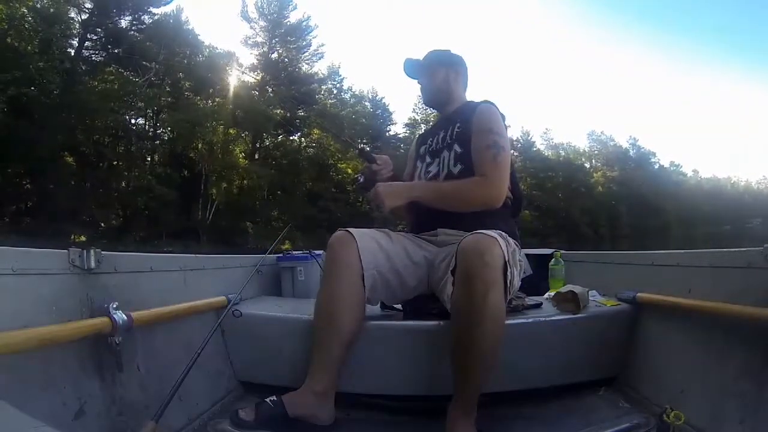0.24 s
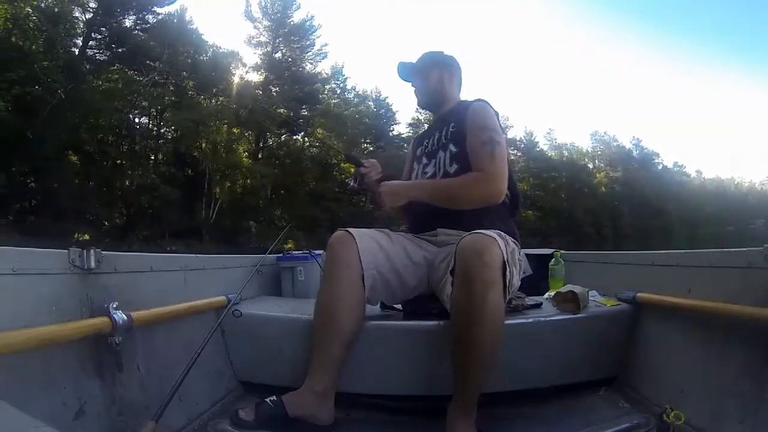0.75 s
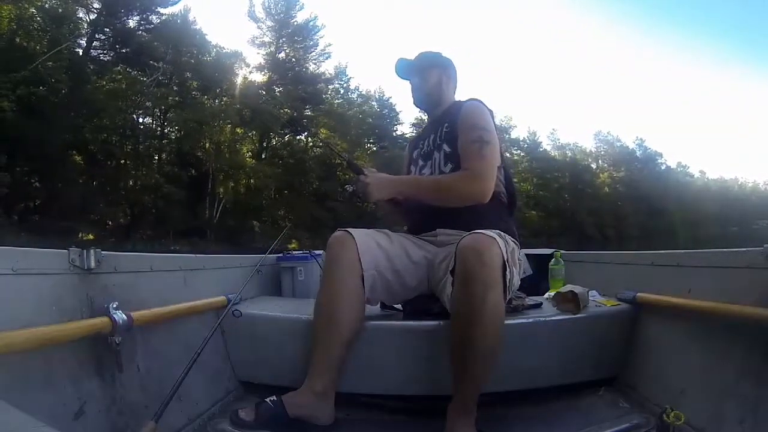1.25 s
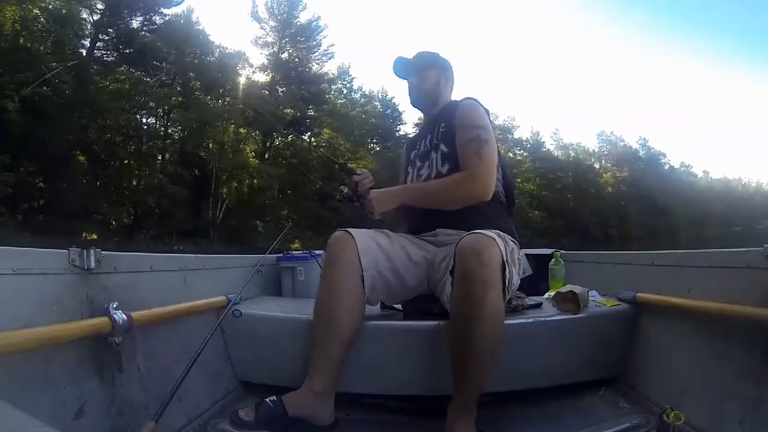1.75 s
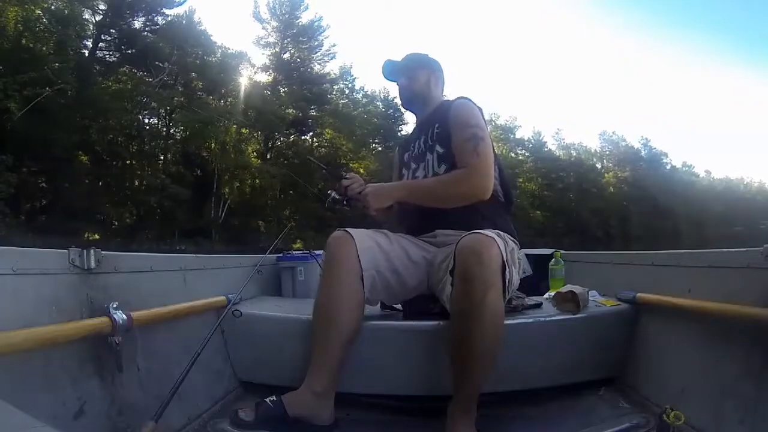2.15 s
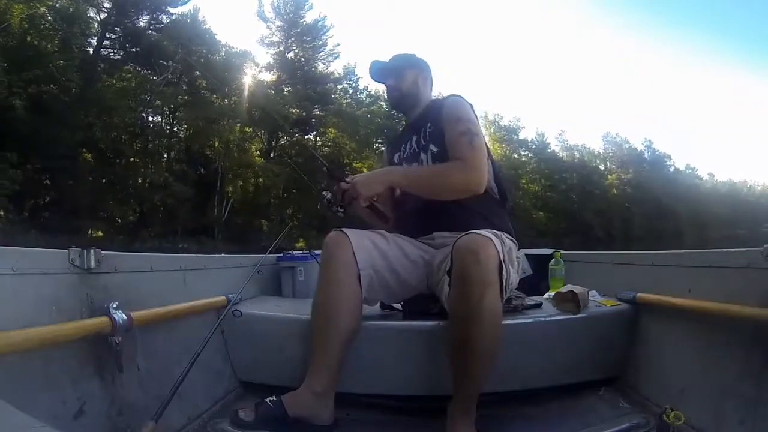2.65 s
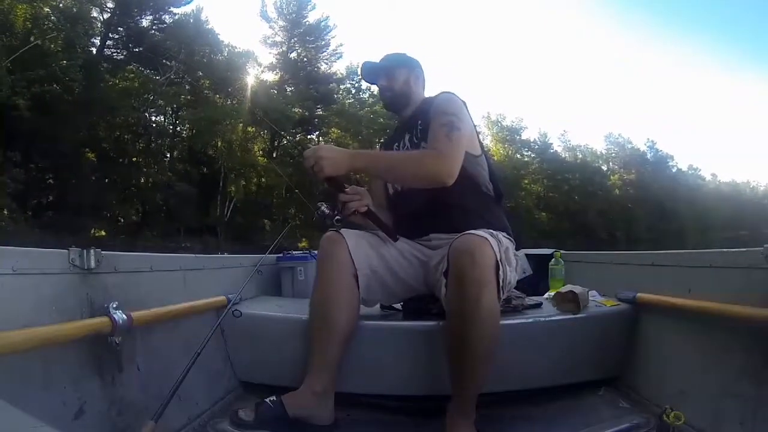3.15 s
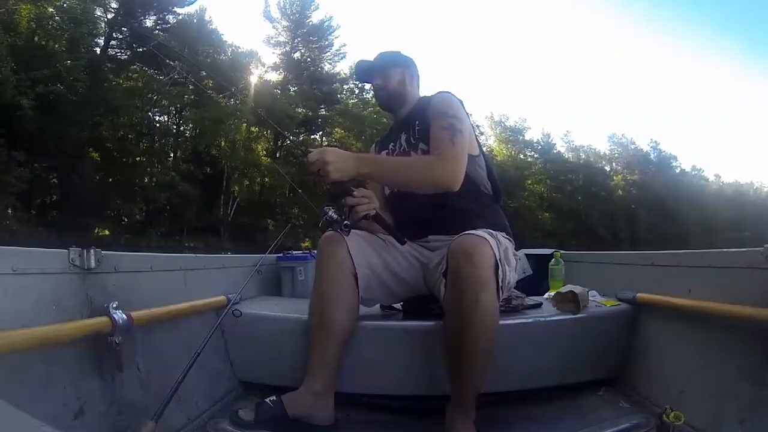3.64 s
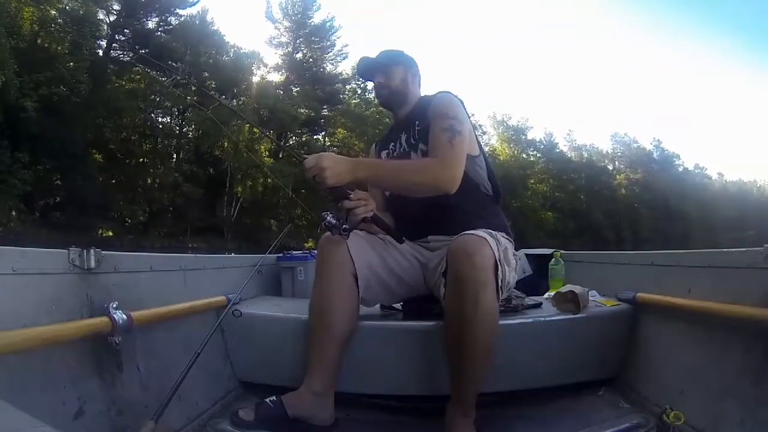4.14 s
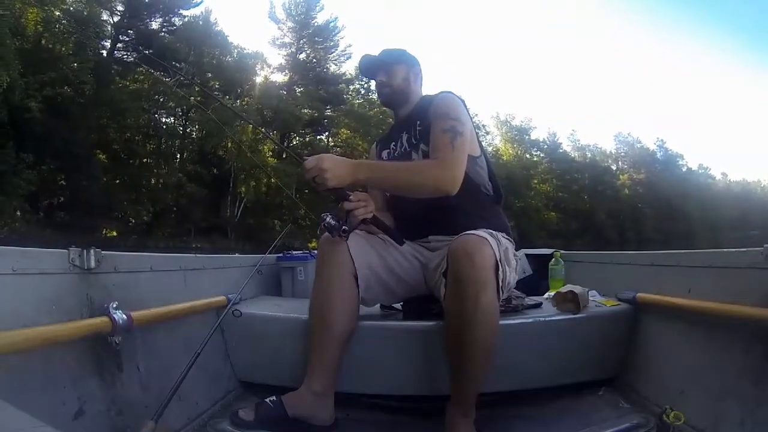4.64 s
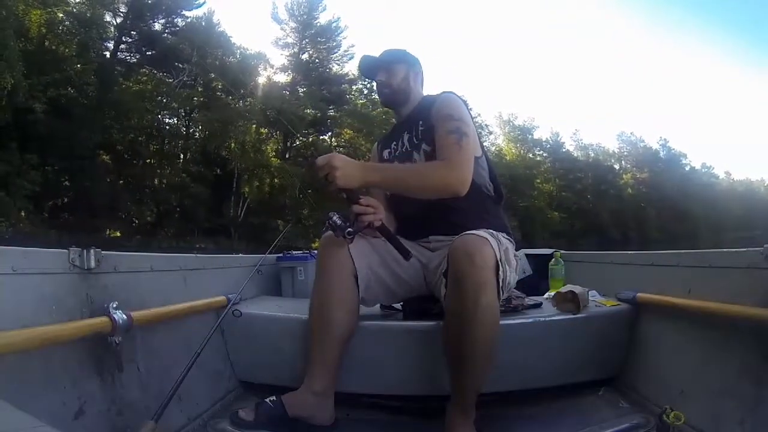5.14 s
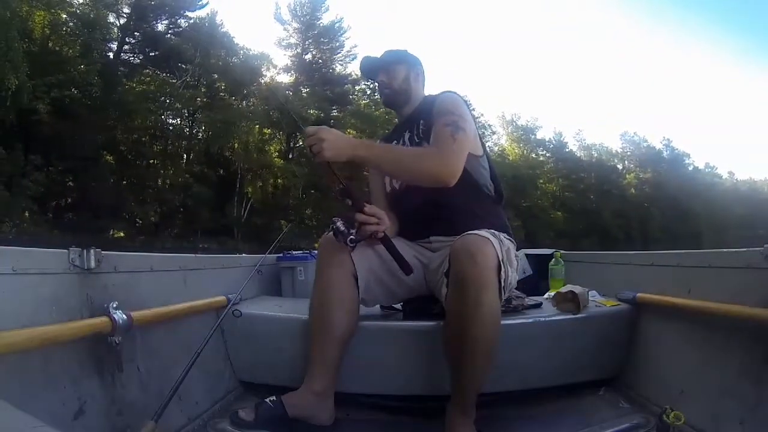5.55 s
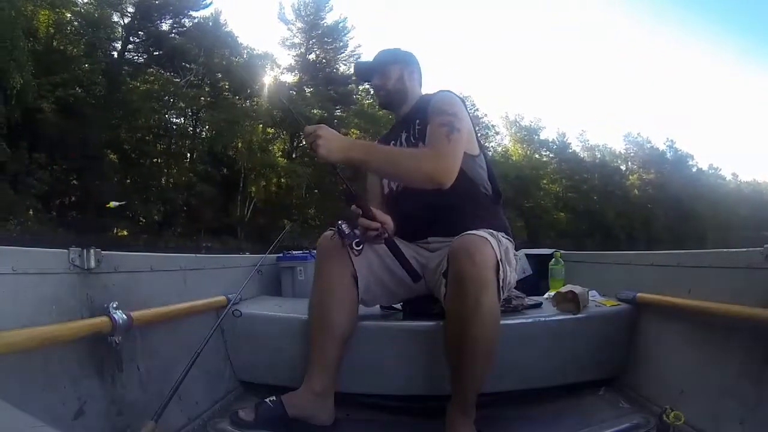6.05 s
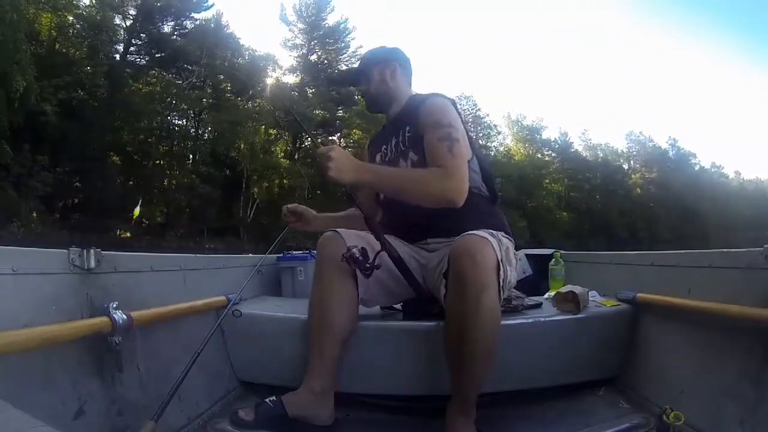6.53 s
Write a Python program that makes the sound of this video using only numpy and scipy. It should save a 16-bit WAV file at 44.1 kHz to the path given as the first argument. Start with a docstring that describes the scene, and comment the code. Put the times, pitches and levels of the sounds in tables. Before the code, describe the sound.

In a small metal boat, a fishing reel clicks, the hull thumps and clunks, and water glugs and laps alongside over low hiss and faint birdsong.

```python
"""Angler in a small boat

An angler handles a rod and reel in a small aluminium boat on a calm lake. The reel snaps and ticks in
filtered noise and metal modes; blows ring the modes of hull and bench. Water glugs, splashes, drips and laps
along the side in swarms of bubbles and noise bursts, heard directly and through the hull.
Far birds sing in gliding sines blurred by echoes, over steady noise: a low hiss and rumble."""
import sys
import numpy as np
from scipy import signal
from scipy.fft import rfft, irfft
from scipy.io import wavfile
from scipy.ndimage import uniform_filter1d

SR = 44100
rng = np.random.default_rng(int(sys.argv[2]) if len(sys.argv) > 2 else 0)


def persist_wave(psi):
    """Save psi, clipped to +-1, as 16-bit WAV."""
    counts = np.round(np.clip(psi, -1, 1) * 32767).astype(np.int16)
    wavfile.write(sys.argv[1], SR, np.atleast_2d(counts).T)


N = 299421

# centres of the spectrum bands of splashes and drops [Hz]
BANDS_HZ = np.geomspace(100, 16000, num=60)
# ripples along the side: (crest time [s], relative gurgle level [dB], relative fizz level [dB],
# build-up [s], t60 [s], bubble pitch at the crest [Hz], glide [octaves/s])
RIPPLES = [(.23, -57.5, -60, 0.05, 0.96, 1500, 0), (2.99, -54.5, -54.5, 0.057, 3.5, 1310, 3.5),
           (3.16, -46, -82, 0.077, 2, 590, -3), (3.315, -44.5, -60, 0.0091, 0.27, 890, -17),
           (3.582, -45, -61.5, 0.055, 0.094, 557, -5), (3.88, -51.5, -63, 0.048, 1.07, 690, -3.5),
           (4.11, -58.5, -57.5, 0.11, 1.2, 870, -9), (4.34, -51.5, -89, 0.016, 1.17, 520, -0.5),
           (5.19, -62.5, -76, 0.071, 1.25, 655, 5), (5.56, -47.5, -58, 0.049, 0.89, 1000, 4.5),
           (5.70, -49.5, -50, 0.086, 0.81, 467, 2), (6.02, -53.5, -57.5, 0.027, 1.3, 890, 0.5),
           (6.43, -58.5, -60, 0.1, 0.45, 1460, -1.5)]


def amp(db):
    """Decibels to gain."""
    return 10 ** (np.asarray(db) / 20)


def evened(x):
    """Scales to rms 1."""
    return x / np.sqrt(np.mean(x ** 2) + 1e-20)


def read(points, hz):
    """Reads a spectrum table on a log-frequency axis."""
    f, value = np.transpose(points)
    return np.interp(np.log(hz + 1), np.log(f + 1), value)


def add(mix, s, sound):
    """Mixes a sound in at a time, or at zero if the time is negative."""
    part = mix[max(round(s * SR), 0):][:len(sound)]
    part += sound[:len(part)]


def clock(size):
    """Sample times from zero."""
    return np.arange(size) / SR


def tint(x, points):
    """Colours a signal by a spectrum; rms 1."""
    gain = amp(read(points, np.fft.rfftfreq(len(x), 1 / SR)))
    return evened(irfft(rfft(x) * gain, len(x)))


def cut(x, hz, kind, order):
    """Causal low-pass or high-pass."""
    sos = signal.butter(order, min(hz, SR / 2 - SR / 20), kind, fs=SR, output="sos")
    return signal.sosfilt(sos, x)


def ring(modes, t):
    """Struck modes of alternating sign, each a decaying sine."""
    out = np.zeros(len(t))
    for k, (hz, db, t60) in enumerate(modes):
        out += (-1) ** k * amp(db - 60 * t / t60) * np.sin(2 * np.pi * hz * t)
    return out


def echo(x, t60, delay):
    """A tail of sparse reflections with energy 1; delay and t60 in s."""
    t = clock(size=44100)
    signs = rng.choice([-1., 1.], len(t))
    sparse = rng.random(len(t)) < 1 / 20
    taps = signs * sparse * (t > delay) * amp(-60 * t / t60)
    return signal.fftconvolve(x, taps / np.linalg.norm(taps))[:N]


def reel(rise_s=0.0027, boat_db=-15):
    """The bail and handle click: a brief rattle with a few metal modes, thrown back by the boat's sides."""
    # snaps and ticks: (time [s], level [dB], low-pass edge [Hz], rattle t60 [s])
    ticks = [(1.4745, -31, 3400, 0.031), (1.638, -24, 16200, 0.043), (2.31, -61.5, 14100, 0.071),
             (2.779, -52.5, 14100, 0.041), (2.842, -46, 9600, 0.02), (2.932, -59, 14000, 0.023)]
    # rattle spectrum: (frequency [Hz], relative density [dB])
    rattle_spectrum = [(200, 7), (800, -1), (6000, 0), (14000, 3.5), (16000, -6)]
    # ringing parts: (frequency [Hz], relative level [dB], t60 [s])
    metal_modes = [(1497, -22.5, 0.11), (1920, -15, 0.042), (5860, -7.5, 0.02), (8410, -13, 0.016),
                   (11000, -8, 0.025)]
    out, t = np.zeros(N), clock(size=8192)
    for s, db, top_hz, t60 in ticks:
        rattle = tint(rng.standard_normal(len(t)), rattle_spectrum) * amp(-60 * t / t60)
        click = (rattle + ring(metal_modes, t)) * (1 - np.exp(-t / rise_s)) * 2
        add(out, s, amp(db) * cut(click, top_hz, "low", order=2))
    return out + amp(boat_db) * echo(cut(out, 3600, "low", order=1), t60=0.045, delay=0.015)


def knocks(panel_db=-5, modes_db=-4, push_db=6, contact_cycles=0.39, node_q=4.0):
    """Each blow pushes the sheet metal and rings it, less so near its node; softer ones last longer."""
    # (time [s], level [dB], hardness as low-pass edge [Hz], high-pass edge [Hz], factor on t60 [-],
    # node where the blow lands [Hz])
    blows = [(1.474, -29.5, 594, 118, 0.99, 480), (1.655, -33.5, 550, 68, 1.37, 1030),
             (1.686, -31, 175, 60, 1.4, 486), (2.542, -48.5, 272, 49.3, 1.7, 724),
             (2.799, -25.5, 335, 72, 1.04, 665), (3.091, -15, 490, 61, 0.68, 2040),
             (3.111, -26, 166, 69.6, 2.16, 400), (3.498, -27.5, 378, 80, 0.75, 530),
             (3.569, -33.5, 885, 200, 1.27, 1170), (3.701, -33.5, 317, 102, 1.3, 430),
             (4.195, -33, 1070, 91, 1.74, 164)]
    # hull modes: (frequency [Hz], relative level [dB], t60 before the blow's factor [s])
    hull_modes = [(86.1, -10, 1), (136.25, -6.5, 0.44), (158, 1, 0.11), (197, -4, 0.25), (232.4, -3, 0.31),
                  (272, -8.5, 0.29), (320, -3, 0.089), (348.5, -5, 0.22), (411, -7.5, 0.31),
                  (452, -8.5, 0.24), (591, -3.5, 0.17), (640.4, 0, 0.07), (822, -9, 0.16)]
    # crowd of weaker panel modes: (frequency [Hz], relative density [dB])
    panel_spectrum = [(50, 1), (100, 13), (300, 3.5), (520, 6), (700, 7), (1050, 8), (3000, -5),
                      (8000, -68)]
    # their decay: (frequency [Hz], t60 before the blow's factor [s])
    panel_t60 = [(80, 1), (250, 0.72), (600, 0.42), (1200, 0.13), (3000, 0.4), (8000, .06)]
    out, t = np.zeros(N), clock(size=32768)
    for s, db, top_hz, bass_hz, hold, node_hz in blows:
        u = t * top_hz / contact_cycles - 2
        push = u * np.exp((1 - u ** 2) / 2)
        hz, age, z = signal.stft(tint(rng.standard_normal(len(t)), panel_spectrum), SR, nperseg=512)
        decay = amp(-60 * age / (hold * read(panel_t60, hz)[:, None]))
        panels = signal.istft(z * decay, SR, nperseg=512)[1][:len(t)]
        modes = ring([(f, level, t60 * hold) for f, level, t60 in hull_modes], t)
        body = amp(push_db) * push + amp(modes_db) * modes + amp(panel_db) * panels
        body = signal.lfilter(*signal.iirnotch(node_hz, node_q, SR), body)
        body = cut(cut(body, top_hz, "low", order=2), bass_hz, "high", order=2)
        add(out, s, amp(db) * body)
    return out


def bench(rise_s=.001):
    """A blow on the hollow bench rings a few low, woody modes and weaker ones above."""
    # (time [s], level [dB])
    blow = (1.4746, -32.5)
    # (frequency [Hz], relative level [dB], t60 [s])
    bench_modes = [(197, 0, .28), (323, -7, .4), (361, -6, .4), (633, 0, 0.13), (1367, -14, .1),
                   (1674, -8, .075), (2272, -9, .071)]
    out, t = np.zeros(N), clock(size=32768)
    s, db = blow
    add(out, s, amp(db) * (1 - np.exp(-t / rise_s)) * ring(bench_modes, t))
    return out


def bubble(hz, swell_s, rise):
    """An air pocket swells and dies; with rise above 0 its pitch climbs as it nears the surface."""
    u = clock(int(8 * swell_s * SR) + 2) / swell_s
    pitch = hz * (1 + rise * (u - 1.3))
    envelope = (u * np.exp(1 - u)) ** 2
    return envelope * np.sin(2 * np.pi * (np.cumsum(pitch) / SR + rng.random()))


def burble(hz, length_s, cycles, count):
    """A short run of small bubbles of like size, within a quarter octave of one pitch."""
    out = np.zeros(8192)
    for when, size, strength in rng.random((count, 3)):
        pitch = hz * 2 ** ((size - .5) / 2)
        gain = (.5 + strength) * np.sin(np.pi * when)
        add(out, when * length_s, gain * bubble(pitch, cycles / pitch, rise=0))
    return out


def glugs(rise_per_cycle=0.016, churn_db=-13, churn_cycles=16, churn_db_per_cycle=1.57):
    """Larger air pockets close under the hull and glide upward, amid a churn that grows with swell time."""
    # (time [s], level [dB], nominal pitch [Hz], swell time [cycles])
    pockets = [(0.032, -40.5, 1994, 7.6), (.160, -35, 796, 2), (.169, -36.5, 747, 6), (.2, -54, 968, 10),
               (.238, -47.5, 755, 9.3), (.274, -51.5, 944, 9.1), (3.131, -28.5, 1204, 1.1),
               (3.427, -29.5, 226, 1.53), (3.521, -28, 318, 1.03), (3.543, -39, 374, 5.2),
               (3.581, -29, 481, 2.2), (3.614, -52, 1650, 10.7), (3.634, -27.5, 231, 1.6),
               (3.667, -32.5, 279.6, 1.24), (3.731, -46.5, 1323, 8.5), (3.854, -36.5, 920, 1.2),
               (3.866, -48, 443, 4.6), (4.103, -43.5, 693, 4.5), (4.123, -28.5, 1105, 3.96),
               (4.14, -32, 288, 1.9), (4.215, -33.5, 490, 4.2), (4.322, -36.5, 595, 1.4),
               (4.342, -45, 532, 5.1), (4.391, -28, 254.6, 1.93), (4.57, -47, 402, 1.8),
               (4.733, -55.5, 1400, 7.9), (5.471, -38, 1190, 0.83), (5.518, -29.5, 1310, 1.4),
               (5.531, -23, 626, 0.75), (5.546, -35.5, 1290, 2.3), (5.555, -39.5, 244, 6.8),
               (5.584, -32.5, 1060, 0.89), (5.586, -44.5, 639, 7.8), (5.687, -51, 500, 1.9),
               (5.995, -44, 824, 4.2)]
    out = np.zeros(N)
    for s, db, hz, cycles in pockets:
        add(out, s, amp(db) * bubble(hz, cycles / hz, rise_per_cycle * cycles))
        churn_s = churn_cycles / hz
        churn_gain = amp(db + churn_db + churn_db_per_cycle * cycles)
        add(out, s - churn_s / 4, churn_gain * burble(hz, churn_s, cycles=1.48, count=8))
    return out


def splashes(full_width_octaves=0.68, full_db=-42, skirt_db=-19, rise_s=0.0028, pocket_db=-5,
             pocket_s=0.00048):
    """A slap on the side bursts into drops around one air pocket; the gentler, the more alike the drops."""
    # (time [s], level [dB], centre [Hz], t60 [s])
    slaps = [(0.043, -43.5, 4340, 0.016), (0.159, -57.5, 1850, 0.097), (0.363, -55.5, 2670, 0.045),
             (2.963, -43, 1520, 0.085), (3.119, -33.5, 4940, 0.014), (3.128, -46, 4230, 0.033),
             (3.164, -47, 1500, 0.035), (3.203, -51.5, 2360, 0.094), (3.277, -51.5, 776, 0.17),
             (3.44, -44, 1030, 0.035), (3.7, -44.5, 990, 0.025), (4.021, -38, 1400, 0.037),
             (4.194, -31.5, 1000, 0.079), (4.195, -36, 5600, 0.024), (5.476, -49, 4600, 0.033),
             (5.515, -39.5, 4900, 0.06), (5.559, -35.5, 5760, 0.017), (5.619, -33.5, 5730, 0.022),
             (5.631, -40, 7300, 0.051), (5.784, -40, 7260, 0.023), (5.937, -51.5, 1900, 0.028),
             (6.022, -42.5, 6070, 0.017), (6.157, -48, 1940, 0.031), (6.25, -51.5, 2350, 0.022),
             (6.357, -47, 1940, 0.03)]
    out, t = np.zeros(N), clock(size=4096)
    for s, db, hz, t60 in slaps:
        octaves = np.log2(BANDS_HZ / hz)
        width = full_width_octaves * min(amp(db - full_db), 1)
        hump = np.exp(-(octaves / width) ** 2 / 2) + amp(skirt_db) / (1 + octaves ** 2 / 2)
        grains = rng.standard_normal(len(t)) * rng.exponential(1, len(t))
        spray = tint(grains, np.c_[BANDS_HZ, 20 * np.log10(hump)])
        add(out, s, amp(db - 60 * t / t60) * (1 - np.exp(-t / rise_s)) * 2 * spray)
        add(out, s, amp(db + pocket_db) * bubble(hz, pocket_s, rise=0))
    return out


def drops(width_octaves=0.87, t60=0.024, rise_s=0.0018):
    """Each single drop lands on the water with one dry tick, about an octave wide."""
    # (time [s], level [dB], centre [Hz])
    landings = [(2.895, -57, 9500), (3.392, -53, 9500), (3.564, -52, 5060), (3.721, -51, 4800),
                (3.803, -54, 4330), (3.932, -53, 5940), (5.532, -41, 5200), (5.670, -53, 6000),
                (5.692, -46, 6540), (5.712, -42.5, 8500), (5.727, -43.5, 9500), (5.966, -54, 3650),
                (5.987, -48, 5800)]
    out, t = np.zeros(N), clock(size=2048)
    for s, db, hz in landings:
        hump = 1 / (1 + (np.log2(BANDS_HZ / hz) / width_octaves) ** 2)
        tick = tint(rng.standard_normal(len(t)), np.c_[BANDS_HZ, 20 * np.log10(hump)])
        add(out, s, amp(db - 60 * t / t60) * (1 - np.exp(-t / rise_s)) * 2 * tick)
    return out


def surge(age, build_s, t60):
    """A ripple builds up to its crest, then drains away."""
    return np.where(age < 0, np.exp(-(age / build_s) ** 2 / 2), amp(-60 * np.maximum(age, 0) / t60))


def gurgle(spread_octaves=0.91, skirt_db=-17, cycles=2.61, per_s=55, size_db=3, clump_db=4.5, rise=0.062,
           calm_db=-75):
    """Each ripple traps clumps of air pockets around one sliding pitch; a few form even in the calm."""
    # (frequency [Hz], relative level [dB])
    gurgle_spectrum = [(280, 5), (600, 3.5), (1800, 2), (3400, -9)]
    out, t = np.zeros(N), np.arange(0, N / SR, .005)
    pitches = np.geomspace(gurgle_spectrum[0][0], gurgle_spectrum[-1][0], num=22)
    clumps = uniform_filter1d(rng.standard_normal((22, len(t))), size=5, axis=0)
    clumps = evened(uniform_filter1d(clumps, size=5, axis=1))
    for hz, clump in zip(pitches, clumps):
        power = amp(calm_db) ** 2
        for s, db, _, build_s, t60, crest_hz, glide in RIPPLES:
            octaves = np.log2(hz / crest_hz) - glide * (t - s)
            hump = np.exp(-(octaves / spread_octaves) ** 2 / 2) + amp(skirt_db)
            power = power + (amp(db) * surge(t - s, build_s, t60) * hump) ** 2
        clump_curve = np.interp(clock(N), t, np.minimum(clump, 2))
        sizes = amp(size_db * np.minimum(rng.exponential(1, N), 2) + clump_db * clump_curve)
        train = (rng.random(N) < per_s / SR) * sizes * rng.choice([-1, 1], N)
        swarm = evened(signal.oaconvolve(train, bubble(hz, cycles / hz, rise))[:N])
        level = np.interp(clock(N), t, np.sqrt(power / len(clumps)))
        out += amp(read(gurgle_spectrum, hz)) * swarm * level
    return out


def froth(per_s, cycles, spread_db):
    """A swarm of tiny bubbles and drops of many sizes; rms 1."""
    # (frequency [Hz], relative level [dB])
    fizz_spectrum = [(2500, 6.5), (5000, 8.5), (15000, 8)]
    out = np.zeros(N)
    for hz in np.geomspace(fizz_spectrum[0][0], fizz_spectrum[-1][0], num=36):
        grain = bubble(hz, cycles * rng.uniform(.6, 1.4) / hz, rise=0)
        strengths = amp(spread_db * np.minimum(rng.exponential(1, N), 3))
        train = (rng.random(N) < per_s / 36 / SR) * strengths
        swarm = signal.oaconvolve(train, grain / np.linalg.norm(grain))[:N]
        out += amp(read(fizz_spectrum, hz)) * swarm
    return evened(out)


def lapping(gurgle_gain_db=-1, fizz_gain_db=-4.0, crackle_db=2, clump_db=7, clump_hz=28, calm_fizz_db=-72.5):
    """Ripples gurgle and fizz along the side as the boat rocks; their spray crackles in short clumps."""
    t = clock(N)
    power = sum((amp(db) * surge(t - s, build_s, t60)) ** 2 for s, _, db, build_s, t60, *_ in RIPPLES)
    spray_level = np.sqrt(power)
    fizz = froth(per_s=6500, cycles=1.5, spread_db=4.0)
    drift = evened(cut(rng.standard_normal(N), clump_hz, "low", order=2))
    clumps = amp(clump_db * np.minimum(drift, 1))
    crackle = evened(clumps * echo(froth(per_s=600, cycles=1.4, spread_db=3), t60=0.015, delay=0))
    spray = spray_level * evened(fizz + amp(crackle_db) * crackle)
    return amp(gurgle_gain_db) * gurgle() + amp(fizz_gain_db) * (amp(calm_fizz_db) * fizz + spray)


def whistle(start, db, note, quaver=0.0398):
    """Start and sound of one thin note that bends through three pitches; quaver is its rms pitch fraction."""
    offset, length, *pitches = note
    u = clock(int(length * SR)) / length
    hz = np.polyval(np.polyfit([0, .5, 1], pitches, 2), u)
    hz = hz * (1 + quaver * evened(uniform_filter1d(rng.standard_normal(len(u)), size=50)))
    tone = np.sin(2 * np.pi * np.cumsum(hz) / SR)
    return start + offset, amp(db) * np.sqrt(np.sin(np.pi * u)) * tone


def bird(level_db=-4.5, direct_db=-3.5, leaves_db=-6, leaves_t60=0.39, trees_t60=2.3, ending_db=-56.5):
    """Far chirps, slurs and whistles, blurred by near leaves and, but for the soft ending, by the trees."""
    # repeats of one phrase: (slur time [s], relative slur level [dB], relative lead-in level [dB])
    phrases = [(.02, -51.5, -57.5), (0.306, -55, -56.5), (0.585, -55.5, -60), (0.867, -54.5, -56.5),
               (1.153, -50, -55)]
    # notes: (time from the slur's start [s], length [s], start [Hz], middle [Hz], end [Hz])
    slur = (0, 0.06, 4950, 3850, 3050)
    lead_in = [(-.133, 0.03, 6050, 5680, 4900), (-.042, 0.03, 4410, 5170, 5820)]
    # the last slur trails off, same columns
    ending = (0.05, .18, 2950, 2650, 2380)
    # single whistles: (time [s], relative level [dB], length [s], start [Hz], middle [Hz], end [Hz])
    singles = [(6.214, -58.5, .13, 4480, 3830, 2990), (6.752, -56, 0.042, 6230, 6000, 6160)]
    song, last = np.zeros(N), np.zeros(N)
    for s, slur_db, lead_db in phrases:
        add(song, *whistle(s, slur_db, slur))
        for note in lead_in:
            add(song, *whistle(s, lead_db, note))
    for s, db, *note in singles:
        add(song, *whistle(s, db, (0, *note)))
    add(last, *whistle(phrases[-1][0], ending_db, ending, quaver=0.019))
    near = amp(direct_db) * (song + last) + amp(leaves_db) * echo(song + last, t60=leaves_t60, delay=0)
    return amp(level_db) * (near + echo(song, t60=trees_t60, delay=0.018))


def air(level_db=-56.5):
    """Steady hiss over a low rumble: coloured noise."""
    # (frequency [Hz], relative density [dB])
    air_spectrum = [(15, -21), (27, -6), (40, -4.5), (100, -13.5), (200, -19), (330, -25), (550, -36.5),
                    (1200, -36), (2300, -40.5), (5000, -42), (9000, -45), (14500, -43), (15800, -71)]
    return amp(level_db) * tint(rng.standard_normal(N), air_spectrum)


def scene(hull_db=-9):
    """The water is heard directly and through the ringing hull."""
    water = glugs() + splashes() + drops() + lapping()
    through_hull = amp(hull_db) * echo(cut(water, 2750, "low", order=1), t60=0.13, delay=.004)
    return (knocks() + bench() + reel() + water + through_hull + bird() + air())[None]


def record(dry, offset=-.0187, edge_hz=15600):
    """The recorder's constant offset and band limit."""
    low_pass = signal.firwin(255, edge_hz, window=("kaiser", 8), fs=SR)
    return offset + signal.oaconvolve(dry, low_pass[None], "same")


dry = scene()
out = record(dry)
persist_wave(out)
```